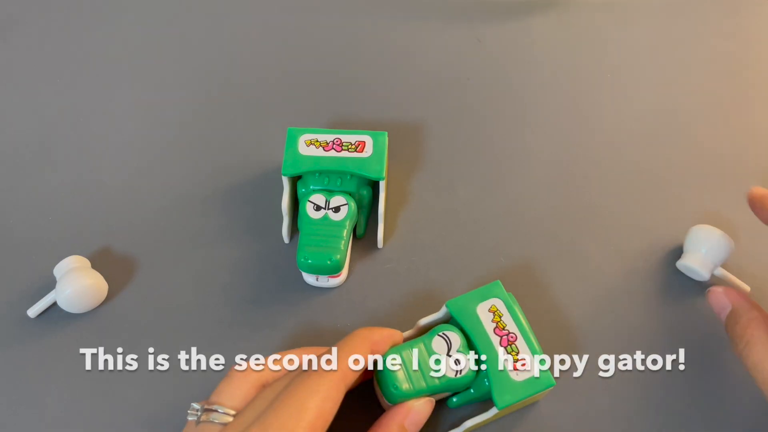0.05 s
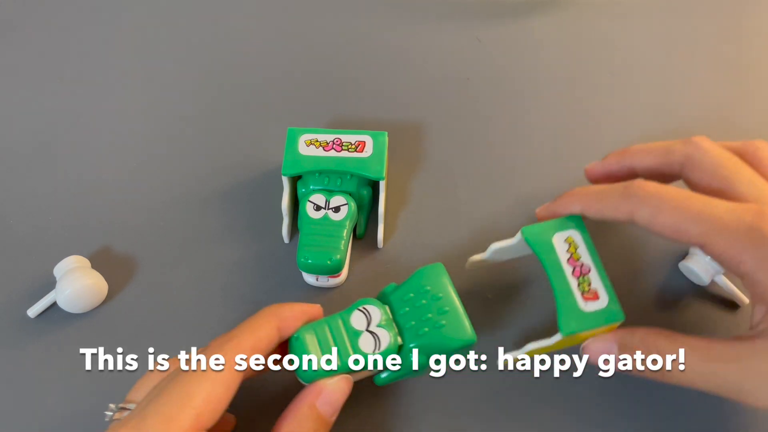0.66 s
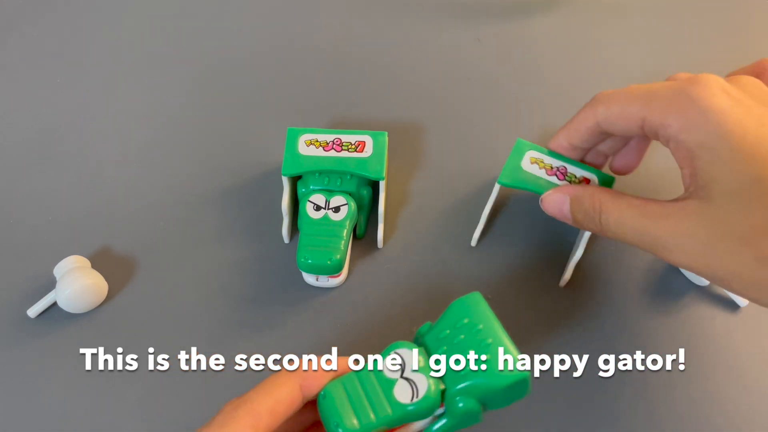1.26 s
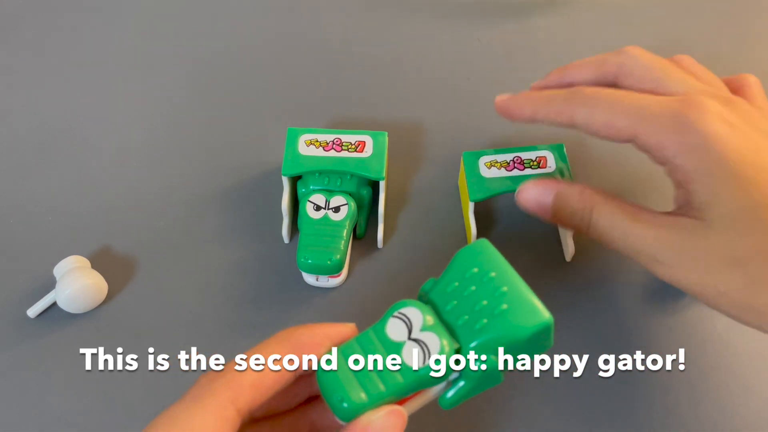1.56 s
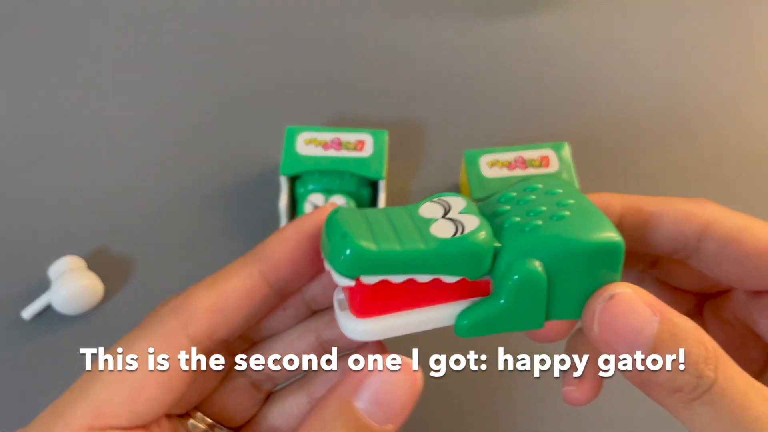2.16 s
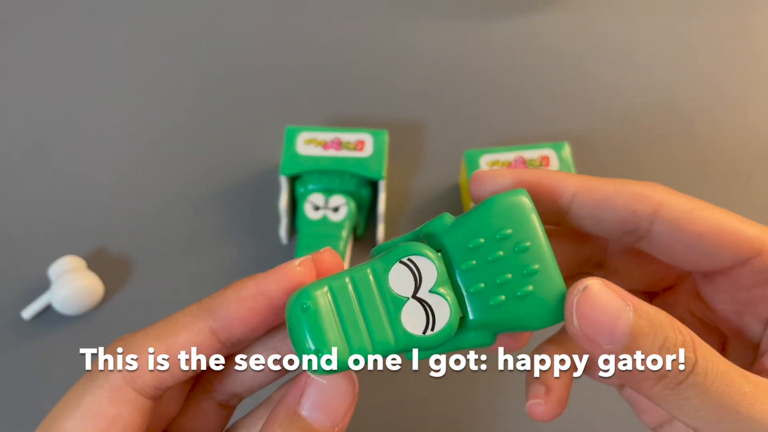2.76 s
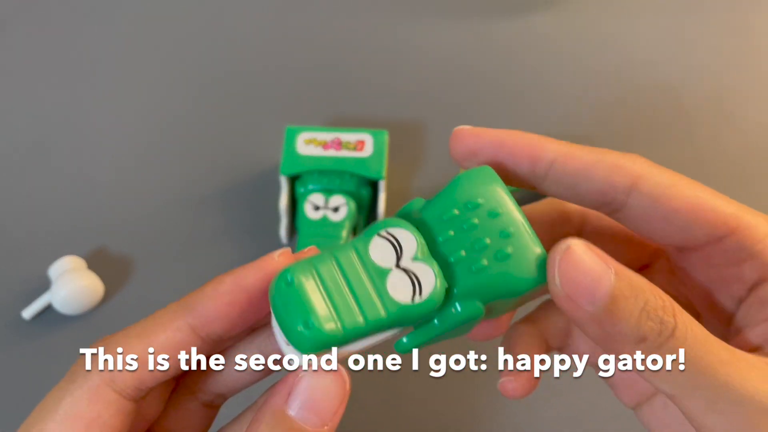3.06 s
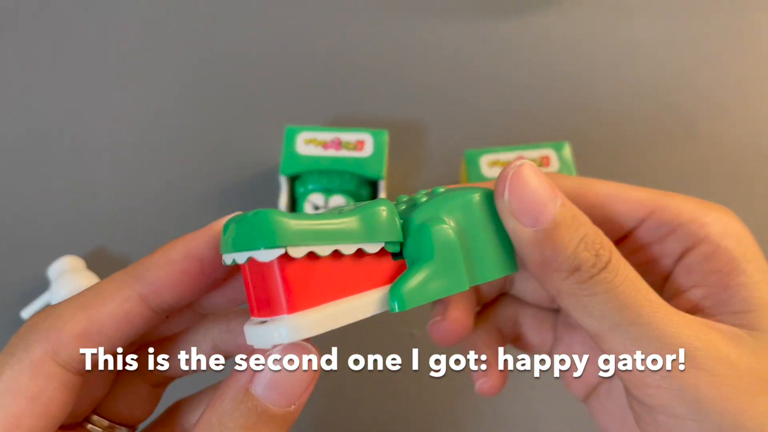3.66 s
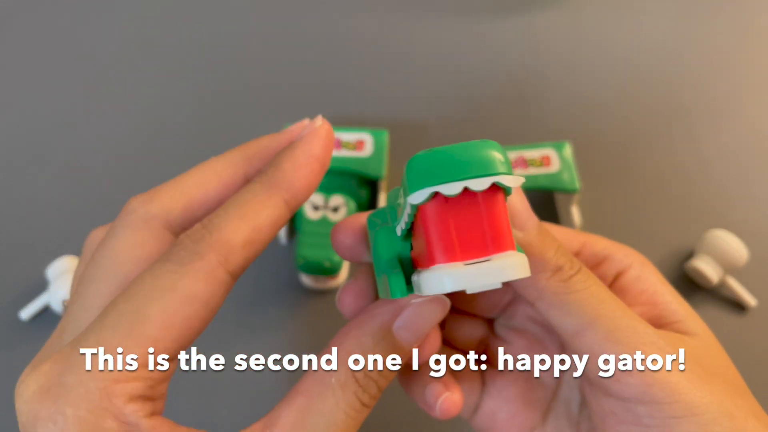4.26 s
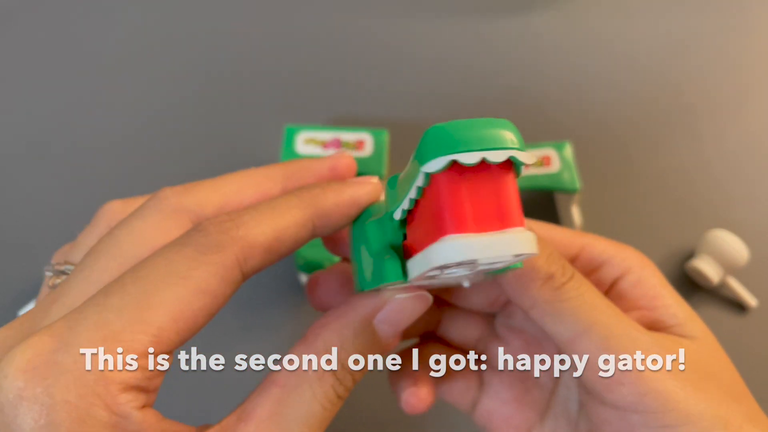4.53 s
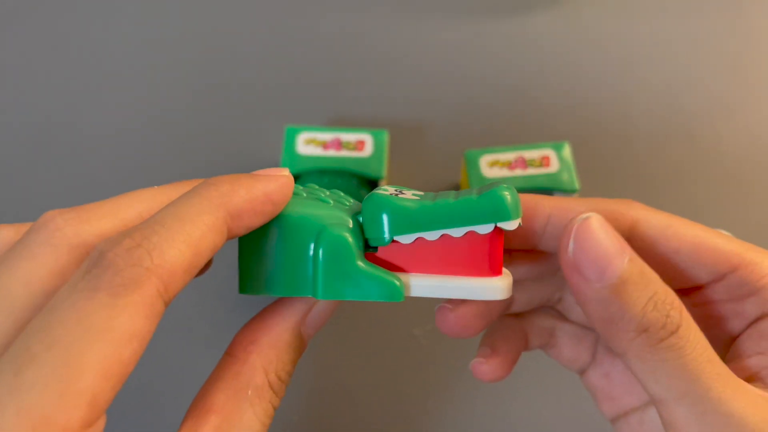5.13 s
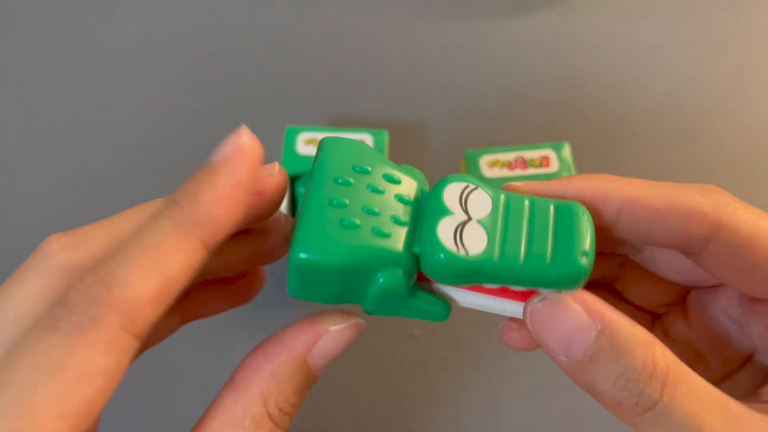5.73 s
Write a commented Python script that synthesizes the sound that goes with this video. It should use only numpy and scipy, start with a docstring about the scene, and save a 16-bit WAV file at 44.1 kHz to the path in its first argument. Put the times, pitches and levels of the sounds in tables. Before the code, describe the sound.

Small plastic toys are handled on a table, close to a stereo microphone, in a quiet room with a steady low hum. Plastic knocks on the tabletop right at the start. At about 0.3 seconds a frame snaps off a hollow toy and is dragged away, with more clacks around 0.5 seconds. Near 0.9 seconds it squeaks faintly and drops with the loudest clack, ringing very briefly. From 1.1 to 1.5 seconds it is shoved along in short scrapes with two more knocks, the table thudding beneath it.

From about 1.8 seconds fingers turn the toy over: its loose jaw gives sparse, light clicks and skin faintly brushes the shell. The hollow clicks come thicker and stronger between 3.9 and 4.7 seconds, hands bump softly on the table around 4.5 to 5 seconds, and a few last clicks and a light rub follow until 5.7 seconds.

```python
"""Plastic toys on a table

Close to a stereo microphone, in a quiet room with a low hum, a plastic frame snaps off a small hollow
toy, is dragged away, drops on the table top and is shoved across it. The board thuds and groans under it.
Then fingers turn the toy over: its loose jaw clicks and skin brushes the shell."""
import sys
import numpy as np
from scipy import signal
from scipy.fft import rfft, irfft
from scipy.io import wavfile
from scipy.ndimage import uniform_filter1d

SR = 44100
rng = np.random.default_rng(int(sys.argv[2]) if len(sys.argv) > 2 else 0)


def transcribe(u):
    """Save the signal u as a 16-bit wav file named by the first command-line argument.

    u: samples, shape (n,) or (channels, n), limited to [-1, 1]; the rate is SR.
    q: integer samples, one column per channel.
    """
    v = np.clip(np.atleast_2d(u).T, -1, 1)
    q = np.round(v * 32767).astype(np.int16)
    wavfile.write(sys.argv[1], SR, q)


N = 255339
TAPS = 8192  # samples in one struck sound

# plastic meets the table, close to the microphone: (time [s], force [dB], hardness [dB])
KNOCKS = [(0.001, -38, 11), (0.036, -45.5, -1.5), (0.051, -43.5, 8), (0.113, -75, 9), (0.242, -57, -11),
          (0.312, -47.5, 9.5), (0.340, -51, -9), (0.412, -46.5, 3), (0.435, -43, -6.5),
          (0.512, -50.5, 23.5), (0.524, -44.5, 12.5), (0.545, -51, 13.5), (0.806, -47, 9.5),
          (0.900, -41, 9), (0.926, -34, 17), (0.953, -44, 5), (1.147, -46.5, 16.5), (1.383, -46.5, 21.5),
          (1.521, -51.5, -32), (1.548, -59, -31)]
# colours of the toy's clack, the board's thud and the contact tick: (frequency [Hz], level [dB])
CLACK = [(200, -27), (500, -11.5), (720, 2.5), (1130, -3.5), (1450, -6), (1750, -18.5), (2150, -19),
         (2700, -33), (5000, -48), (12000, -65)]
THUD = [(40, -18.5), (110, -0.5), (170, -5.5), (240, -13), (340, -2.5), (600, -6.5), (900, -23),
        (2500, -61.5)]
TICK = [(800, -27.5), (2200, 4.5), (3600, -1.5), (4600, -22), (6800, -24.5), (8500, -36.5), (13000, -35),
        (16000, -55.5)]


def knocks():
    """The contact ticks, the toy clacks, and the board answers with a slower thud and a short ring."""
    out = np.zeros((2, N))
    thud, clack, tick = colour(THUD), colour(CLACK), colour(TICK)
    # the frame rocks: a second foot lands just after the first, weaker and softer
    second_feet = [(s + .012, force_db - 6.5, hard_db - 10) for s, force_db, hard_db in KNOCKS]
    for s, force_db, hard_db in KNOCKS + second_feet:
        clack_db = force_db + hard_db - 13
        tick_db = force_db + 1.95 * hard_db - 50  # grows fastest with hardness
        ring_db = force_db + .55 * hard_db - 8.5
        sound = gain_of(clack_db) * blow(clack, rise=.0003, t60=.039, tail_db=-16.5, tail_t60=.19)
        sound += gain_of(force_db - 2) * blow(thud, rise=.00081, t60=.06, tail_db=-11.5, tail_t60=.21)
        sound += gain_of(tick_db) * blow(tick, rise=.00049, t60=.008, tail_db=-16.5, tail_t60=.081)
        sound += gain_of(ring_db) * table_ring()
        add(out, s, panned(sound, pan_db=.55))
    return out


# modes of the table top: (frequency [Hz], level [dB])
TABLE_MODES = [(318, -2.5), (374, 1.5), (506, 1), (635, 1.5), (758, -5.5), (835, -4), (985, -2),
               (1045, -2.5), (1131, -2), (1225, -9.5), (1320, -15.5), (1412, -13)]


def table_ring():
    """Every blow strikes the table's modes a little differently; the higher ones die sooner."""
    t = np.arange(TAPS) / SR
    hz, db = np.transpose(TABLE_MODES)[:, :, None]
    t60 = .125 * (hz[0] / hz) ** .25
    place, phase, spread = rng.standard_normal((3, len(TABLE_MODES), 1))
    fade = gain_of(db + 2 * place - 60 * t / t60) * (1 - np.exp(-t / .002))
    angle = 2 * np.pi * (hz * t + phase)
    return np.array([(fade * np.sin(angle + side * .26 * spread)).sum(0) for side in (1, -1)])


# the frame drops on its feet, right of centre: (time [s], level [dB])
DROP = (0.928, -31.5)
# modes of the free frame: (frequency [Hz], level [dB], t60 [s])
FREE_FRAME = [(1800, 0, 0.063), (1750, -3.5, 0.055), (2128, -11, 0.074), (2610, -15, 0.016),
              (3740, -23.5, 0.034), (3715, -15, 0.02)]


def frame_ring():
    """With no finger on it, the dropped frame rings at its own few pitches."""
    out, t = np.zeros((2, N)), np.arange(TAPS) / SR
    s, drop_db = DROP
    ring = sum(gain_of(db - 60 * t / t60) * np.sin(2 * np.pi * (hz * t + rng.random()))
               for hz, db, t60 in FREE_FRAME)
    attack = 1 - np.exp(-t / .00073)
    add(out, s, panned(gain_of(drop_db) * ring * attack, pan_db=-4))
    return out


# the frame's catches: (time [s], force [dB], hardness [dB], edge sharpness [dB], wall pitch [Hz])
SNAPS = [(0.297, -38.5, 0.5, -24, 1070), (0.305, -49, 13, -10, 1400), (0.310, -48, 12, -10, 1003),
         (0.334, -40.5, 16.5, -1, 1780), (0.510, -58.5, 11.5, -10, 1730), (0.533, -60, 12, -7, 1500),
         (0.917, -71.5, 9, 5, 1499), (0.927, -52.5, 6.5, -14.5, 1496)]
# resonances of the gripped frame: (frequency [Hz], width [Hz], lift [dB])
GRIPPED_FRAME = [(1080, 93, 4), (2040, 200, 12.5), (3320, 110, 8), (4065, 160, 18.5), (4210, 80, 14),
                 (4830, 90, 7.5), (6020, 260, 12), (6720, 400, 8.5), (7040, 260, 14), (10200, 190, 7),
                 (11650, 400, 8)]


def frame_snaps():
    """The frame scrapes over its catches, snaps free and rattles."""
    return clicks(SNAPS, GRIPPED_FRAME, rise=.0006, t60=.011, tail_db=-24,
                  snap_lift_db=-14, body_lift_db=-6, edge_lift_db=-4.5, pan_db=-1.04)


# taps of the jaw: (time [s], force [dB], hardness [dB], edge sharpness [dB], wall pitch [Hz])
JAW_TAPS = [(1.845, -86.5, 25.5, 10.5, 1560), (1.989, -65, 10, -5, 1600), (2.009, -68.5, 18.5, 6, 1654),
            (2.048, -62.5, -6, -30, 1650), (2.205, -70, -10, -28, 1450), (2.679, -79, 14, -18, 1550),
            (3.005, -88, 16.5, -17, 1550), (3.260, -82.5, 23.5, 8, 1520), (3.361, -95.5, 16, 11, 1540),
            (3.911, -69, 2, -25.5, 1535), (3.921, -55.5, -3, -22, 1474), (3.977, -60.5, -1, -24, 2090),
            (4.06, -58.5, 1.5, -24, 1540), (4.075, -56.5, 7, -17, 1450), (4.1066, -53.5, 2.5, -22, 1490),
            (4.144, -66, -4, -28, 2100), (4.24, -55, -2, -17, 1550), (4.291, -58.5, -14, -35, 1498),
            (4.361, -73, -4, -18, 2110), (4.3946, -57.5, -7.5, -18.5, 1512), (4.443, -53, 3, -11.5, 1520),
            (4.458, -55.5, -20, -28, 1350), (4.499, -67.5, 11, -7, 1480), (4.507, -58.5, 10.5, -15.5, 1690),
            (4.527, -60, 8, -21, 1580), (4.614, -56.5, -5, -21.5, 1500), (4.640, -55, -4.5, -19.5, 1525),
            (4.652, -56.5, -9, -26, 1435), (5.1431, -54.5, 9, -21, 1520), (5.1558, -52, 4, -35.5, 1540),
            (5.2927, -61, 1, -40, 1554), (5.438, -53, 7.5, -7.5, 1520), (5.472, -62.5, 4.5, -22.5, 1520),
            (5.661, -75.5, 21, -1, 1550)]
# resonances of the toy's shell: (frequency [Hz], width [Hz], lift [dB])
SHELL = [(874, 137, 15), (1142, 17, 8.5), (2210, 94, 12.5), (2510, 134, 11), (2940, 220, 3.5),
         (3410, 18, 9), (3780, 120, 7), (4740, 170, 12), (5630, 120, 16.5), (6050, 350, -2.5),
         (10050, 190, 12.5), (12900, 98, -7)]


def jaw_clicks():
    """The loose jaw taps the hollow shell, a little left of the microphone."""
    return clicks(JAW_TAPS, SHELL, rise=.0011, t60=.014, tail_db=-18.5,
                  snap_lift_db=-15, body_lift_db=-6.5, edge_lift_db=0, pan_db=2)


# colours of a click's hollow body, snap and sharp edge: (frequency [Hz], level [dB])
HOLLOW = [(150, -19), (500, -5), (900, -5.5), (1600, 6.5), (2300, -13.5), (3500, -37), (9000, -47.5)]
SNAP = [(900, -34.5), (2200, -5.5), (3200, 4), (5700, -2.5), (7300, -9.5), (10000, -25), (16000, -27)]
EDGE = [(3000, -45.5), (7000, -15.5), (8500, 3), (10500, -1), (13000, -2.5), (16500, -12)]


def clicks(rows, resonances, rise, t60, tail_db, snap_lift_db, body_lift_db, edge_lift_db, pan_db):
    """Plastic hits plastic and rings briefly in the damping hand; hard contacts are brighter."""
    out = np.zeros((2, N))
    usual_wall_hz, wall_width_hz = 1530, 250
    # the part springs back and strikes again, weaker and softer
    rebounds = [(s + .011, force_db - 17.5, hard_db - 6.5, edge_db - 6.5, wall_hz)
                for s, force_db, hard_db, edge_db, wall_hz in rows]
    for s, force_db, hard_db, edge_db, wall_hz in rows + rebounds:
        # each point of contact favours other resonances
        struck = [(hz, width, db + 3 * rng.standard_normal()) for hz, width, db in resonances]
        # a smaller wall raises the pitch of the whole hollow body
        body_points = [(hz * wall_hz / usual_wall_hz, db) for hz, db in HOLLOW]
        body = colour(body_points, struck + [(wall_hz, wall_width_hz, 14)])
        hollow = blow(body, rise=.0006, t60=t60, tail_db=tail_db - .5, tail_t60=.09)
        snap = blow(colour(SNAP, struck), rise, t60, tail_db, tail_t60=.074)
        edge = blow(colour(EDGE, struck), rise=.00017, t60=.015, tail_db=-22, tail_t60=.16)
        # the hands shade the bright snap more than the hollow body
        sound = gain_of(hard_db + snap_lift_db) * panned(snap, pan_db + 3)
        sound += gain_of(body_lift_db) * panned(hollow, pan_db)
        sound += gain_of(edge_db + edge_lift_db) * edge
        add(out, s, gain_of(force_db) * sound)
    return out


# the frame is dragged away from the toy: (start [s], rise [s], fall [s], level [dB])
DRAGS = [(0.336, 0.011, 0.13, -61), (0.384, 0.11, .33, -60), (0.508, .014, 0.06, -65)]
# colour of the dragging: (frequency [Hz], level [dB])
DRAG_HISS = [(900, -28.5), (1600, 1), (2200, -5.5), (2800, -10.5), (3300, 1.5), (4000, -4.5), (4700, -4),
             (6200, -9.5), (7400, -19.5), (8500, -11), (9500, -21.5), (13000, -19.5), (15000, -32.5)]


def drags():
    """Dragging rubs the frame, which excites its resonances less than a snap does."""
    rubbed = [(hz, width * .67, db * .44) for hz, width, db in GRIPPED_FRAME]
    return sum(slide(*row, colour(DRAG_HISS, rubbed), hiss_db=-7.5, groan_db=-11) for row in DRAGS)


# the frame is shoved along on its feet: (start [s], rise [s], fall [s], level [dB], foot pitch [Hz])
SHOVES = [(1.183, 0.058, 0.068, -65, 5680), (1.286, 0.065, 0.051, -70.5, 5560),
          (1.397, .011, .11, -60.5, 5820), (1.462, 0.036, .04, -67, 5880)]
# colour of the shoving: (frequency [Hz], level [dB])
SHOVE_HISS = [(940, -40), (1600, -8.5), (2700, 1), (3200, 0), (3600, -3.5), (4900, -13), (5750, 3),
              (6600, -9.5), (7300, -7), (8100, -45), (9300, -12.5), (12900, -22.5), (15000, -23)]
# resonances of the feet: (frequency [Hz], width [Hz], lift [dB])
FEET = [(3145, 47, 9.5), (5740, 170, 7.5), (7100, 220, 3)]


def shoves():
    """Short pushes across the table; the grip shifts the pitch at which the feet ring."""
    out = np.zeros((2, N))
    for start, rise, fall, db, foot_hz in SHOVES:
        shift = foot_hz / FEET[1][0]
        feet = [(hz * shift, width, lift_db) for hz, width, lift_db in FEET]
        out += slide(start, rise, fall, db, colour(SHOVE_HISS, feet), hiss_db=3.5, groan_db=6.5)
    return out


# colour of the board under the sliding feet: (frequency [Hz], level [dB])
GROAN = [(70, -35), (120, -2), (205, -10.5), (330, 2.5), (500, -7.5), (770, -9), (1100, -16.5), (1700, -27),
         (3000, -46.5)]


def slide(start, rise, fall, db, response, hiss_db, groan_db):
    """The frame's thin feet hiss over the matt table top and make the board groan."""
    out, t = np.zeros((2, N)), np.arange(0, rise + fall, 1 / SR)
    braking = np.clip((t - rise) / fall, 0, 1) ** .9
    speed = np.minimum(t / rise, 1) * np.cos(np.pi / 2 * braking) ** 2
    hiss = friction(len(t), response, grain_db=1.8, grain_s=.003)
    groan = friction(len(t), colour(GROAN), grain_db=1, grain_s=.024)
    sound = gain_of(hiss_db) * speed * panned(hiss, pan_db=1)
    sound += gain_of(groan_db) * speed ** .45 * groan  # follows the speed less than the hiss does
    add(out, start, gain_of(db) * sound)
    return out


# squeaks just before the drop: (centre time [s], length [s], level [dB])
SQUEAKS = [(0.835, 0.12, -79.5), (0.885, 0.056, -72.5), (0.915, 0.048, -65.5)]
# resonances of the squeaking foot: (frequency [Hz], width [Hz], lift [dB])
SQUEAK_PEAKS = [(3800, 120, 19), (6340, 120, 12)]


def foot_squeaks():
    """A foot rubs and squeaks as the frame tips."""
    return strokes(SQUEAKS, colour(SNAP, SQUEAK_PEAKS), grain_db=2.5)


# fingertips on the plastic, heard up close: (centre time [s], length [s], level [dB])
BRUSHES = [(0.545, 0.082, -72), (0.93, 0.16, -72.5), (3.01, 0.035, -89.5), (3.25, 0.13, -80),
           (3.49, 0.03, -84), (4.49, 0.038, -76), (5.29, .05, -85), (5.67, 0.13, -73.5)]
# colour of rubbing skin: (frequency [Hz], level [dB])
SKIN = [(600, -21), (1500, -12), (2600, -3), (4600, -4.5), (5900, -5), (7200, -14), (8400, -5), (10000, -6),
        (13500, -7), (15000, -46)]


def finger_brushes():
    """Dry skin brushes the shell, damps its resonances and squeaks faintly as it slips."""
    damped = [(hz, width, db / 2) for hz, width, db in SHELL]
    skin_squeak = (5700, 427, 6)
    # the finger that moves the jaw also slips on the shell at each tap
    slips = [(s + .014, .1, force_db + hard_db - 38) for s, force_db, hard_db, _, _ in JAW_TAPS]
    return strokes(BRUSHES + slips, colour(SKIN, damped + [skin_squeak]), grain_db=3.5)


# hands on the table: (centre time [s], length [s], level [dB])
BUMPS = [(0.1, 0.16, -57), (0.36, 0.38, -52.5), (0.58, 0.3, -60.5), (1.0, 0.19, -50.5), (1.535, .11, -53.5),
         (4.53, 0.055, -58), (4.72, 0.21, -57.5), (4.98, 0.38, -60.5)]
# colour of their rumble: (frequency [Hz], level [dB])
BUMP_COLOUR = [(30, -18.5), (65, 6), (130, -2.5), (200, -14.5), (400, -38.5), (1500, -65)]


def hand_bumps():
    """Hands shift against the table with soft, low swells."""
    return strokes(BUMPS, colour(BUMP_COLOUR), grain_db=2.5)


# colour of the room tone behind the table: (frequency [Hz], level [dB])
ROOM_TONE = [(15, -30.5), (25, -3), (49, -0.5), (70, -9), (102, -9), (134, -22.5), (166, -22.5),
             (229, -32.5), (293, -30.5), (384, -34), (1400, -46.5), (1520, -40), (1650, -47), (4870, -54.5),
             (16000, -61.5)]
# the room's hum: (frequency [Hz], level [dB], wander [Hz])
HUM = [(40.4, -65.5, 3), (97.8, -66.5, 3.6)]


def room():
    """Low rumble, faint hiss and two wavering hum tones."""
    air = gain_of(-59) * unit_rms(through(noise(N), colour(ROOM_TONE, resonances=[(1370, 31, 5.4)])))
    knots = np.linspace(0, N, 60)
    for hz, db, wander_hz in HUM:
        drift = np.interp(np.arange(N), knots, rng.standard_normal(len(knots)))
        phase = 2 * np.pi * np.cumsum(hz + wander_hz * drift) / SR
        air += gain_of(db) * np.sqrt(2) * np.sin(phase)
    return air


def blow(response, rise, t60, tail_db, tail_t60):
    """Dense vibration after one contact: a burst and a weaker tail, with rms 1 over the first 10 ms."""
    t = np.arange(TAPS) / SR
    swell = 1 - np.exp(-t / rise)
    burst = noise(TAPS) * swell * gain_of(-60 * t / t60)
    # a short contact feeds all pitches about equally
    spectrum = rfft(burst, 2 * TAPS)
    flattened = spectrum / np.sqrt(abs(spectrum) / abs(spectrum).mean() + 1e-9)
    burst = irfft(flattened)[:, :TAPS] * np.sqrt(swell)
    tail = noise(TAPS) * swell * gain_of(tail_db - 60 * t / tail_t60)
    sound = through(burst + tail, response)
    return sound / np.sqrt(np.mean(sound[:, :SR // 100] ** 2))


def friction(size, response, grain_db, grain_s):
    """Tiny slips: coloured noise whose strength jumps from one grain of the surface to the next."""
    grain = unit_rms(uniform_filter1d(rng.standard_normal(size), round(grain_s * SR)))
    slips = noise(size) * gain_of(grain_db * np.clip(grain, -2, 2))
    return unit_rms(through(slips, response))


def strokes(rows, response, grain_db):
    """Short swells of rubbing."""
    swell = np.zeros((2, N))
    for s, length, db in rows:
        add(swell, s - length / 2, gain_of(db) * np.hanning(round(length * SR))[None])
    return swell * friction(N, response, grain_db, grain_s=.0054)


# how alike the microphone's two ports hear: (frequency [Hz], likeness [0-1])
PORT_LIKENESS = [(60, 1), (200, 0.7), (500, 0.5), (1200, 0.5), (5000, 0.5), (9000, 0.9), (15000, .6)]


def noise(size):
    """White noise at the two ports: alike in the bass, less so higher up."""
    left, other = np.exp(2j * np.pi * rng.random((2, size // 2 + 1))) * np.sqrt(size)
    likeness = np.clip(curve_at(PORT_LIKENESS, np.fft.rfftfreq(size, 1 / SR)), -1, 1)
    right = likeness * left + np.sqrt(1 - likeness ** 2) * other
    return irfft([left, right], size)


def colour(points, resonances=()):
    """Causal impulse response of a broad spectrum with resonances standing out of it."""
    hz = np.fft.rfftfreq(TAPS, 1 / SR)
    lift = 1 + sum((gain_of(db) - 1) / (1 + (2 * (hz - peak_hz) / width) ** 2)
                   for peak_hz, width, db in resonances)
    log_gain = np.log(gain_of(curve_at(points, hz)) * np.maximum(lift, .1))
    mirrored = np.concatenate([log_gain, log_gain[-2:0:-1]])
    minimum_phase = np.exp(np.conj(signal.hilbert(mirrored)))
    return np.fft.ifft(minimum_phase).real[None, :TAPS // 2]


def through(x, response):
    """Passes a stereo sound through an impulse response."""
    return signal.fftconvolve(x, response, axes=1)[:, :x.shape[1]]


def curve_at(points, hz):
    """Interpolates a table of points on a log-frequency axis."""
    point_hz, value = np.transpose(points)
    return np.interp(np.log(hz + 1), np.log(point_hz + 1), value)


def gain_of(db):
    """Decibels to amplitude."""
    return 10 ** (np.asarray(db) / 20)


def unit_rms(x):
    """Scales to rms 1."""
    return x / np.sqrt(np.mean(x ** 2) + 1e-30)


def panned(sound, pan_db):
    """Leans a sound to the left by pan_db."""
    return sound * gain_of([[pan_db / 2], [-pan_db / 2]])


def add(mix, s, sound):
    """Mixes a stereo sound in at time s."""
    part = mix[:, max(round(s * SR), 0):][:, :sound.shape[1]]
    part += sound[:, :part.shape[1]]


def scene():
    """Toy, frame and hands on the table up close, the room behind them."""
    handling = frame_snaps() + jaw_clicks() + drags() + foot_squeaks() + finger_brushes() + hand_bumps()
    return handling + knocks() + frame_ring() + shoves() + room()


# the microphone's response: (frequency [Hz], level [dB])
MIC_RESPONSE = [(20, -30), (31, -13.5), (39, 0.5), (13000, 0.5), (14500, -7.5), (16000, -5.5)]
# phase between its ports: (frequency [Hz], lead of the left [rad])
PORT_LEAD = [(200, 0), (900, -.1), (3000, .15), (6000, .25), (7000, -.2), (7700, -2.7), (8900, -3.3),
             (9700, -4.3), (11000, -4.8), (14000, -4.7)]


def record(dry):
    """The stereo microphone loses the deepest bass and top treble; its ports part in phase up high."""
    hz = np.fft.rfftfreq(2 * N, 1 / SR)
    lead = curve_at(PORT_LEAD, hz)
    response = gain_of(curve_at(MIC_RESPONSE, hz)) * np.exp(.5j * np.array([lead, -lead]))
    ports = irfft(rfft(dry, 2 * N) * response)[:, :N]
    lowpass = signal.firwin(255, cutoff=16200, window=("kaiser", 9), fs=SR)
    return signal.oaconvolve(ports, lowpass[None], "same")


dry = scene()
out = record(dry)
transcribe(out)
```